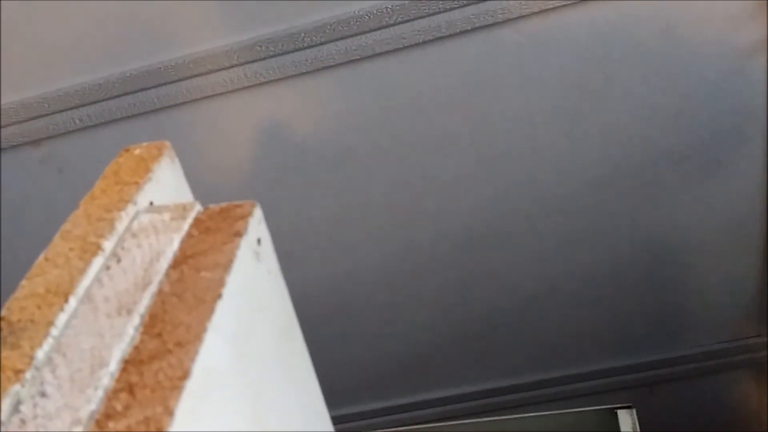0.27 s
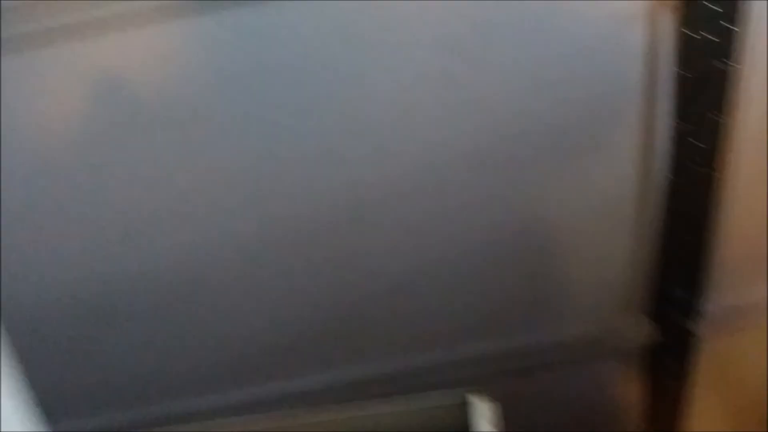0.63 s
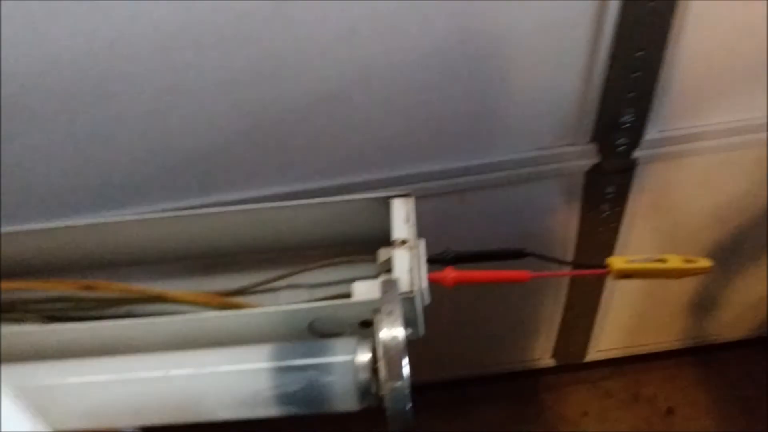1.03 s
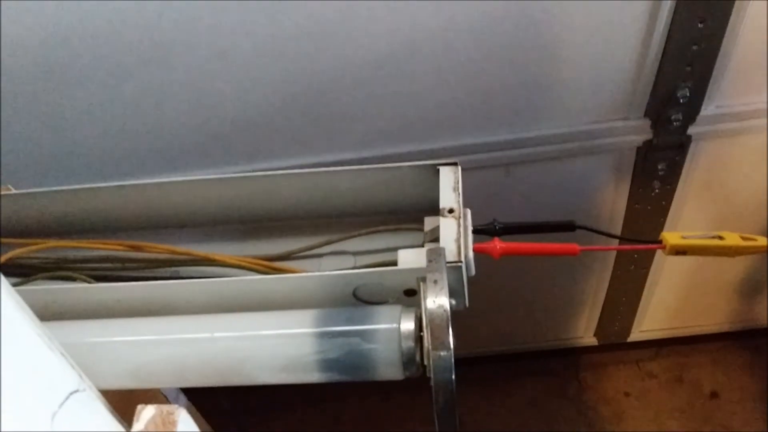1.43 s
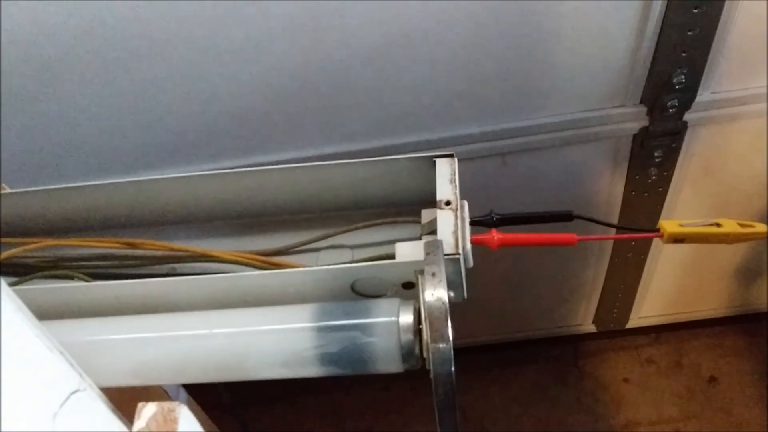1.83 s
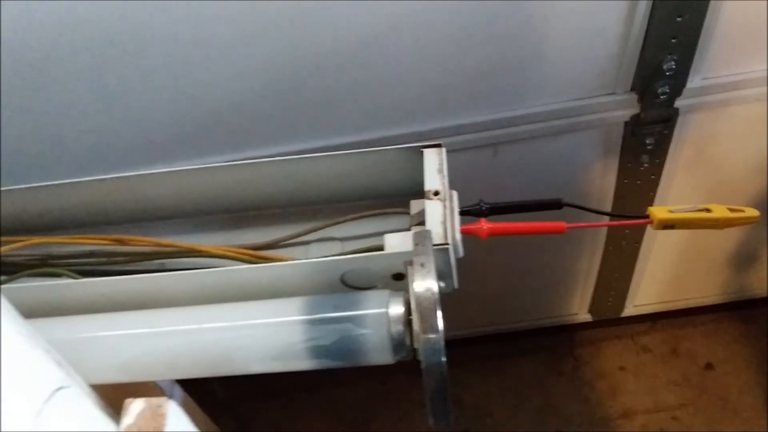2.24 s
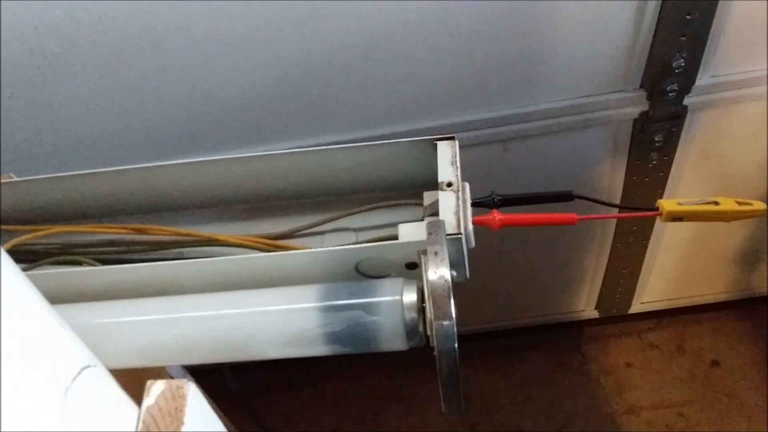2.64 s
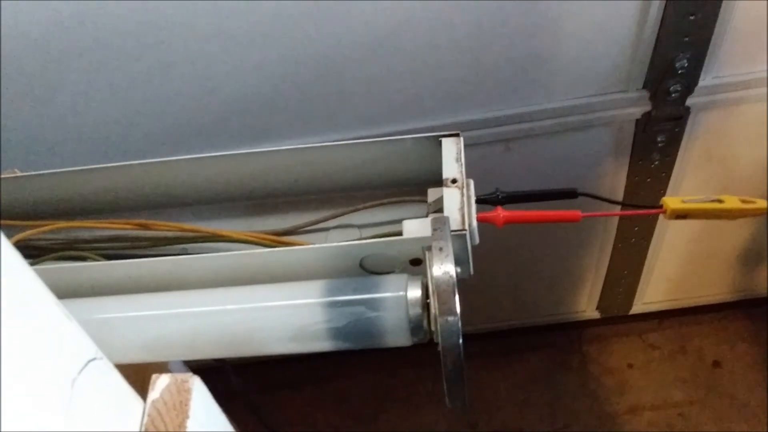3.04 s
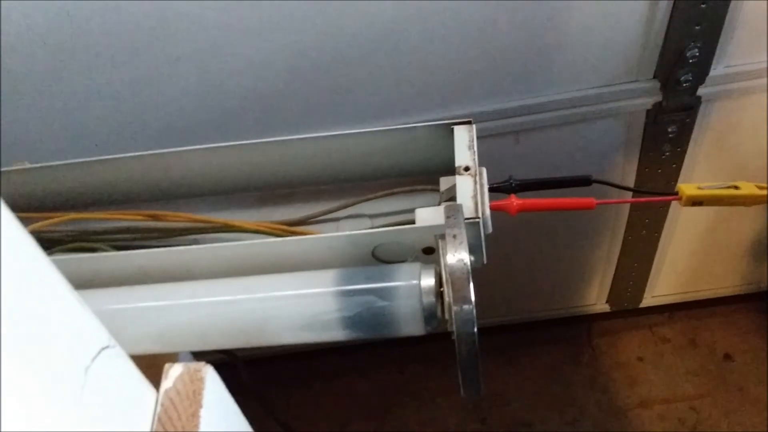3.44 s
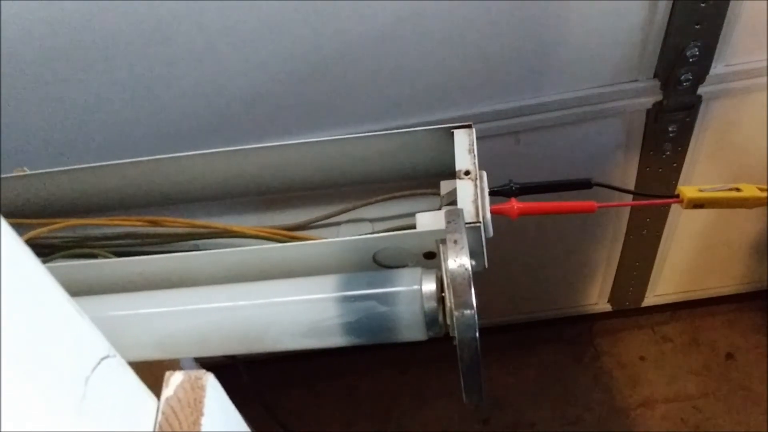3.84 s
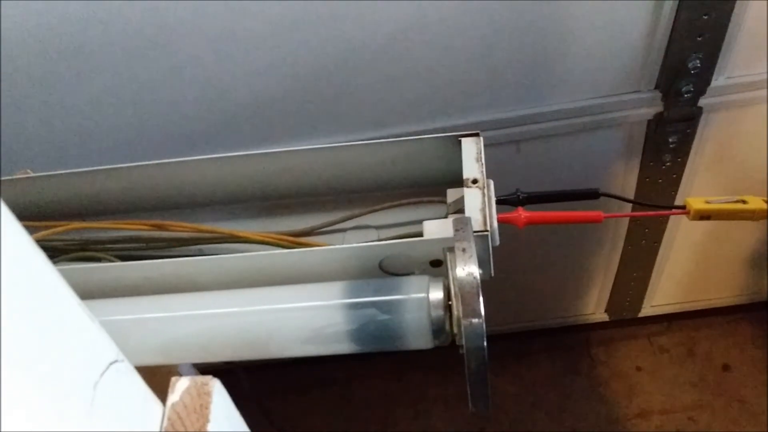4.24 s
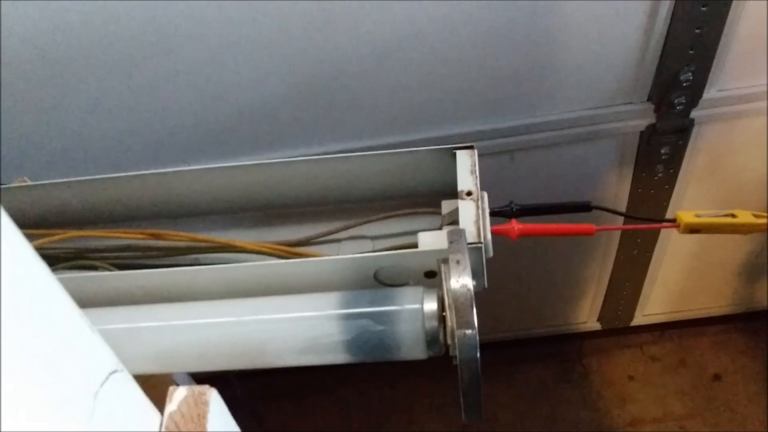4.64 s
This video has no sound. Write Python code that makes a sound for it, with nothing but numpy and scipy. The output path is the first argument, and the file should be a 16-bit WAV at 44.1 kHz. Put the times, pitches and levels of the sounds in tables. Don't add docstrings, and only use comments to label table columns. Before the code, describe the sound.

Someone shifts about beside an unlit tube fitting: thin, piercing key jingles, dry fabric crackles and small gritty sole scrapes, dense for two and a half seconds. Then it is nearly still, with light clinks and low building hum, before another brief burst around four seconds and tiny ticks at the end. Small dry room, bright phone microphone with a sharp ringing treble and little bass.

```python
import sys
import numpy as np
from scipy import signal
from scipy.fft import rfft, irfft, next_fast_len
from scipy.io import wavfile
from scipy.ndimage import uniform_filter1d

SR = 44100
rng = np.random.default_rng(int(sys.argv[2]) if len(sys.argv) > 2 else 0)


def volts_from_decibels(level):
    exponent = np.asarray(level, float) / 20
    return 10 ** exponent


def inscribe(sig):
    pcm = np.round(np.clip(np.atleast_2d(sig).T, -1, 1) * 32767)
    wavfile.write(sys.argv[1], SR, pcm.astype(np.int16))


N = 215843
HIGH_HZ = 9900


def unit(x):
    return x / np.sqrt(np.mean(x ** 2) + 1e-20)


def along(points, hz):
    f, value = np.transpose(points)
    return np.interp(np.log(hz + 1), np.log(f + 1), value)


def filtered(x, response):
    m = next_fast_len(len(x) + 8192)
    return irfft(rfft(x, m) * response(np.fft.rfftfreq(m, 1 / SR)), m)[:len(x)]


def noise(spectrum, size=N, patchy_db=0):
    z = signal.stft(rng.standard_normal(size + 512), nperseg=256)[2]
    field = uniform_filter1d(rng.standard_normal(z.shape), 5, 0)
    field = uniform_filter1d(field, 8, 1)
    x = signal.istft(z * volts_from_decibels(patchy_db * unit(field)), nperseg=256)[1][:size]
    return unit(filtered(x, lambda hz: volts_from_decibels(along(spectrum, hz))))


def add(track, s, sound):
    part = track[round(s * SR):][:len(sound)]
    part += sound[:len(part)]


def port(hz, peak_hz=8800, width_hz=700, peak_db=17, bass_hz=70):
    resonance = volts_from_decibels(peak_db) * 1j * hz * width_hz / (peak_hz ** 2 - hz ** 2 + 1j * hz * width_hz)
    return (1 + resonance) * (1j * hz / (bass_hz + 1j * hz)) ** 2


def ring(modes, t, length, bright_db=0):
    hz, level_db, t60 = np.transpose(modes)[:, :, None]
    level_db = level_db + bright_db * (hz > HIGH_HZ) + rng.normal(0, 1.0, hz.shape)
    fade = volts_from_decibels(level_db - 60 * t / (length * t60)) / abs(port(hz))
    cycles = hz * t + 0.2 * rng.random(hz.shape)
    return np.sum(fade * np.sin(2 * np.pi * cycles), axis=0)


def swells(events):
    out = np.zeros(N)
    for s, db, from_hz, to_hz, length in events:
        t = np.arange(round(length * SR)) / SR
        cycles = from_hz * t + (to_hz - from_hz) * t ** 2 / (2 * length)
        swell = np.sin(np.pi * t / length) ** 2
        add(out, s, volts_from_decibels(db) / abs(port(from_hz)) * swell * np.sin(2 * np.pi * cycles))
    return out


def clinks(events, length, crack_t60):
    # f/Hz, level/dB, t60/s
    key_modes = [
        [(6840, -41, .13), (8840, 0, .125), (9090, -17, .1), (10250, -31, .12), (10700, -32, .17),
         (11645, -23, .09), (12485, -24, .07), (12935, -34, .15), (13645, -33, .12), (15360, -40, .17),
         (15560, -44, .15)],
        [(5270, -36, .15), (7430, -37, .15), (9058, 0, .11), (9074, -10, .16), (9668, -12, .155),
         (11328, -39, .15), (12965, -30, .05), (14345, -33, .11)],
        [(5845, -30, .04), (8090, -15, .11), (8590, -6, .08), (8695, 0, .05), (8810, -7, .13),
         (10275, -13, .06), (11035, -25, .05), (12857, -24, .12), (14140, -28, .08)],
        [(7122, -22, .1), (8155, 1, .06), (8840, 16, .035), (9482, -6, .1), (9695, -11, .095),
         (10550, -12, .075), (11240, -22, .2), (11420, -9, .04), (12250, -15, .045), (13070, -24, .13),
         (13635, -2, .045), (13945, -5, .12), (15362, -15, .14), (15560, -1, .12)],
    ]
    # f/Hz, level/dB, t60/s
    fitting_modes = [
        [(10700, -15, .15), (15360, -5, .14), (15560, 0, .14)],
        [(2150, -6, .07), (3130, 2, .1), (3850, -4, .05), (5820, -4, .03)],
    ]
    # level/dB
    neighbour_db = [-30, -28, -20, -50, -66, -64]
    # f/Hz, level/dB
    steel = [(2000, -3.5), (5000, -2), (7000, -4.5), (8800, 2.5), (11000, -4), (13500, -12), (16000, -13)]
    pieces = key_modes + fitting_modes
    out, t = np.zeros(N), np.arange(SR // 6) / SR
    u = t[:SR // 20]
    for struck, rows in enumerate(events):
        for s, ring_db, crack_db, bright_db in rows:
            tones = np.zeros(len(t))
            for k, modes in enumerate(pieces):
                if k == struck or k < len(key_modes):
                    level_db = ring_db + neighbour_db[k] * (k != struck)
                    tones += volts_from_decibels(level_db) * ring(modes, t, length, bright_db)
            add(out, s, tones * (1 - np.exp(-t / 0.00081)))
            spectrum = [(hz, db + 0.5 * bright_db * (hz > HIGH_HZ)) for hz, db in steel]
            crack = noise(spectrum, size=len(u)) * (1 - np.exp(-u / 0.0011))
            add(out, s, volts_from_decibels(crack_db - 9.5 - 60 * u / crack_t60) * crack)
    return out


def keys():
    # t/s, ring level/dB, crack level/dB, high-mode brightness/dB
    free = [
        [(0.0638, -22.5, -43, -6), (1.229, -39.5, -47, -10), (1.2326, -38, -38, -8), (2.0482, -32.5, -25, 5),
         (2.4145, -31, -42, 4), (2.416, -29.5, -50, 3), (2.4165, -55, -33, -6), (2.4228, -30.5, -52, -12),
         (2.8898, -36, -35.5, 6), (3.2642, -36.5, -31, 5)],
        [(1.5618, -51, -60, 0), (1.7642, -27, -24.5, 8.5), (2.3225, -61, -52, 1)],
        [(0.0638, -29, -62, -12), (1.5595, -34.5, -38, 9), (2.8285, -47, -37, -4), (2.8898, -52, -32, -4),
         (4.1115, -63, -36, 0)],
        [(0.0638, -30.5, -61, 2), (4.1115, -74, -70, 0)],
        [(2.0482, -50, -70, -2), (4.1115, -51, -70, 0)],
        [(2.802, -70, -70, 0), (2.8524, -60, -70, 4), (2.8898, -64, -73, 0)],
    ]
    # t/s, ring level/dB, crack level/dB, high-mode brightness/dB
    muffled = [
        [(0.07, -43, -45, -3), (0.269, -29, -35, 0), (0.5685, -60, -44.5, -1), (0.9438, -29.5, -35.5, 7),
         (1.075, -55, -41, -5), (1.255, -36, -37.5, -5), (2.0482, -24, -64, -9), (2.806, -60, -47, 0),
         (3.242, -66, -38.5, -4), (3.501, -37.5, -42, -11), (3.8162, -77, -55.5, 4), (4.1, -60, -41.5, 2),
         (4.124, -65, -44, 0), (4.134, -65, -54, 0), (1.884, -55, -47, 0), (4.178, -60, -48, 0),
         (4.7635, -71, -47, -7)],
        [(0.269, -33.5, -66, 0), (1.0855, -30.5, -46, -5), (1.5595, -27, -56, 0), (1.928, -30, -15, -12),
         (2.0482, -42, -45, -6), (2.3057, -29, -37.5, 1), (3.2216, -41, -68, 0)],
        [(0.269, -26, -70, -9), (1.5595, -36, -28, 6), (1.9285, -39, -36, -3), (2.1672, -29.5, -35, -4),
         (2.5503, -37, -41, -5), (2.8515, -23, -38, -5), (3.2216, -41, -44, 0)],
        [(0.0638, -48, -33.5, 11), (0.0697, -34, -34, 6.5), (0.269, -45.5, -76, 2)],
    ]
    # t/s, level/dB, start f/Hz, end f/Hz, length/s
    grazes = [(0.073, -23, 8830, 8840, 0.008), (1.355, -41, 9000, 8900, 0.004),
              (1.826, -45, 7300, 7300, 0.004), (1.9285, -23, 8950, 8850, 0.0029),
              (2.3878, -51, 9450, 9400, 0.002), (2.5452, -46, 9900, 9800, 0.002),
              (2.552, -36, 8830, 8750, 0.0039), (0.072, -49, 5660, 5720, 0.0063),
              (0.943, -25, 8580, 8500, 0.0035), (1.5595, -47, 5730, 5900, 0.0063),
              (1.5608, -13, 8730, 8780, 0.0037), (1.573, -32, 8700, 8800, 0.0032),
              (1.6115, -41, 8800, 8900, 0.004), (1.9275, -16, 8700, 8000, 0.0025),
              (2.049, -22, 8850, 8800, 0.0026), (2.85, -44, 5670, 5800, 0.0055),
              (4.002, -39, 7860, 7400, 0.004), (4.179, -51, 8600, 8460, 0.004),
              (4.7645, -31.5, 8800, 8400, 0.0026)]
    wrapped = clinks(muffled, length=0.42, crack_t60=0.039) + swells(grazes)
    return clinks(free, length=1.1, crack_t60=0.013) + wrapped


def snaps():
    # t/s, peak level/dB, fold resonance f/Hz
    crisp = [(0.4283, -23.5, 2800), (0.4858, -29, 2200), (0.5275, -27.5, 2900), (0.661, -34.5, 1970),
             (0.709, -30.5, 2460), (0.736, -26, 2450), (0.747, -33, 2500), (0.7907, -33, 2670),
             (0.798, -38, 2620), (0.8245, -28, 2700), (0.8464, -29, 2300), (1.232, -33, 2330),
             (1.331, -36, 3000), (1.3493, -25, 2300), (1.3797, -24, 2720), (1.444, -47, 2720),
             (1.4649, -20, 2680), (1.4835, -28, 2700), (1.4873, -29, 2450), (1.518, -28, 2900),
             (1.623, -51, 2430), (1.6937, -29, 3000), (1.747, -44, 2700), (1.7564, -23, 2870),
             (1.8093, -25.5, 2800), (1.91, -35, 2500), (1.913, -39, 2800), (1.925, -24, 3000),
             (1.991, -37, 3000), (2.0698, -26, 2900), (2.0936, -31, 2420), (2.1037, -20.5, 2960),
             (2.1324, -28, 2700), (2.136, -29, 2330), (2.1456, -31, 2520), (2.162, -26, 2620),
             (2.4376, -39, 2600), (2.45, -41, 2900), (2.519, -45, 2400), (2.526, -45, 2700),
             (4.001, -30.5, 2000), (4.0945, -28.5, 2280), (4.0948, -30, 2420), (4.1686, -27.5, 2660),
             (4.1691, -20, 2770), (4.171, -32, 2600), (4.4647, -44, 2630)]
    # t/s, peak level/dB, fold resonance f/Hz
    soft = [(1.372, -32, 2600), (1.524, -33, 2700), (2.4495, -35.5, 2930), (0.476, -36, 3020),
            (0.4895, -38, 2600), (0.5, -38, 2600), (0.72, -38, 2500), (0.835, -44, 2600),
            (1.786, -31, 2500), (0.1136, -32, 2380), (0.3586, -33, 2030), (0.364, -34, 1840),
            (0.693, -37, 2520), (0.7503, -27.5, 2440), (0.822, -32, 2660), (0.906, -37.5, 2320),
            (1.4216, -23, 2720), (1.4668, -28, 2300), (1.469, -19.5, 2750), (1.473, -28, 2450),
            (1.478, -34, 2800), (1.4945, -31, 2700), (1.5405, -40, 2000), (1.558, -30, 2100),
            (1.576, -29, 2700), (1.776, -30, 2750), (1.7835, -32, 3040), (1.799, -31.5, 2720),
            (1.8446, -39, 2270), (1.879, -37, 2700), (1.886, -32.5, 2920), (2.2522, -39.5, 2320),
            (4.025, -24, 2650), (4.0465, -31.5, 2400), (4.0725, -41, 2100), (4.128, -37, 2520),
            (4.178, -46, 2700), (4.249, -40, 2400), (4.478, -36.5, 2960), (4.689, -43, 2620),
            (4.822, -49, 2900), (4.849, -48, 2300), (4.886, -43.5, 2600)]
    # t/s, peak level/dB, fold resonance f/Hz
    spiky = [(0.4822, -13, 2720), (0.7166, -34, 3020), (0.9143, -39, 2600), (0.9985, -52, 2500),
             (1.171, -39.5, 3360), (1.2106, -44, 2920), (1.706, -40, 3080), (2.059, -39, 2590),
             (3.2264, -59, 2350), (3.817, -52.5, 2810), (3.878, -50, 2310), (4.7392, -48, 2340)]
    # t/s, peak level/dB, fold resonance f/Hz
    ticks = [(0.628, -53.5, 2668), (1.658, -65, 2537), (1.827, -62, 2700), (2.3404, -54, 2590),
             (2.3884, -70, 1970), (2.3935, -71, 2510), (3.262, -65, 1760), (4, -48, 2610),
             (4.805, -41.5, 2600)]
    # edge level/dB, spike level/dB, decay/cycles
    folds = [
        (-7, -32.5, 7.3),
        (-28, -41, 8.7),
        (-3, -5.5, 5.6),
        (-7, 9.5, 3.8),
    ]
    out, t = np.zeros(N), np.arange(SR // 40) / SR
    for rows, (edge_db, spike_db, cycles) in zip((crisp, soft, spiky, ticks), folds):
        edge = volts_from_decibels(min(edge_db, 4) + 13 - 60 * t / 0.0008) * np.sin(2 * np.pi * 5000 * t)
        spike = volts_from_decibels(spike_db + 30.5 - 60 * t / 0.000066) * np.sin(2 * np.pi * 12500 * t)
        for s, db, hz in rows:
            fold = volts_from_decibels(-60 * t * hz / cycles) * np.sin(2 * np.pi * hz * t)
            pop = -(fold + edge) * (1 - np.exp(-t / 0.00008)) - spike
            after = rng.standard_normal(len(t)) * (rng.random(len(t)) < 0.08) * (t > 0.001)
            after *= volts_from_decibels(-15 - 60 * t / 0.024)
            chatter = np.convolve(after, fold + volts_from_decibels(-5.5) * (edge + spike))[:len(t)]
            add(out, s + 0.001055, volts_from_decibels(db - 1.5) * (pop + chatter))
    return filtered(out, lambda f: (1j * f / (850 + 1j * f)) ** 2)


def scuffs():
    # t/s, peak level/dB, thud level/dB, t60/s
    drags = [(0.113, -50.5, 7, 0.12), (0.7494, -31, -5, 0.022), (1.068, -48.5, -12, 0.38),
             (1.212, -48, -29, 0.53), (1.513, -43, -2, 0.17), (1.88, -51, -21, 0.1),
             (1.925, -32, -23, 0.095), (1.93, -25, -3.5, 0.11), (1.937, -39.5, -34, 0.32),
             (2.092, -41, -40, 0.33), (2.132, -41, -15, 0.2), (2.804, -58.5, -7, 0.6),
             (2.848, -55, -2, 0.12), (2.889, -57.5, -2, 0.13), (3.213, -48.5, -6, 0.23),
             (3.262, -47.5, -20, 0.14), (3.975, -55.5, -5, 0.19), (3.995, -44, -3, 0.11),
             (4.0, -40, -4, 0.068), (4.0239, -34, -17, 0.051), (4.042, -52.5, -4, 0.37),
             (4.112, -37, -2, 0.045), (4.172, -42, -14, 0.034), (4.475, -49, 6, 0.047),
             (4.689, -60.5, 3.5, 0.39), (4.761, -43, -2.5, 0.041), (4.88, -52, 0, 0.096)]
    # f/Hz, level/dB
    grit_spectrum = [(80, -50), (300, -1), (800, -8), (1400, -2), (2600, 2), (5000, -6), (9000, -12.5),
                     (16000, -12.5)]
    # f/Hz, level/dB
    thud_spectrum = [(30, -23), (60, -6), (130, -7.5), (200, 1.5), (400, -3), (700, -12), (1000, -7),
                     (1800, -48)]
    out, t = np.zeros(N), np.arange(SR // 4) / SR
    for s, db, thud_db, t60 in drags:
        grit = noise(grit_spectrum, size=len(t), patchy_db=1.0)
        grit *= volts_from_decibels(-60 * t / t60) * (1 - np.exp(-t / 0.0009))
        thud = noise(thud_spectrum, size=len(t), patchy_db=3.0)
        thud *= volts_from_decibels(thud_db - 60 * t / (1.87 * t60)) * (1 - np.exp(-t / 0.0077))
        add(out, s, volts_from_decibels(db - 7.5) * (grit + thud))
    return out


def step():
    # t/s, level/dB, start f/Hz, end f/Hz,
    # length/s
    flexes = [(0.4825, -43, 633, 484, 0.0057), (1.513, -46.5, 1120, 740, 0.014),
              (1.522, -55, 800, 470, 0.015), (1.952, -44, 810, 740, 0.017), (1.963, -50, 492, 440, 0.027),
              (1.98, -48, 270, 210, 0.022), (4.005, -58, 270, 110, 0.054), (4.1, -56.5, 647, 487, 0.033),
              (4.12, -66, 635, 596, 0.054), (3.882, -67, 995, 950, 0.01), (4.7, -61, 278, 128, 0.082)]
    # f/Hz, level/dB, t60/s
    wood_modes = [(67.5, -9, 0.17), (206.4, -3, 0.17), (397, 2.5, .06), (573, 1, 0.086), (722, -1, 0.12),
                  (925, -2, 0.11), (1327, 5.5, 0.092)]
    knock_s, knock_db = 1.927, -40
    out, t = swells(flexes), np.arange(SR // 4) / SR
    add(out, knock_s, volts_from_decibels(knock_db) * ring(wood_modes, t, 1) * (1 - np.exp(-t / 0.0052)))
    return out


def garage(x):
    # f/Hz, t60/s
    decay = [(200, 0.26), (2000, 0.07), (9000, 0.1), (16000, 0.055)]
    hz, t, z = signal.stft(rng.standard_normal(SR // 2), SR, nperseg=256)
    tail = signal.istft(z * volts_from_decibels(-60 * t / along(decay, hz)[:, None]), SR, nperseg=256)[1]
    return signal.fftconvolve(np.pad(x, (150, 0)), tail / np.linalg.norm(tail))[:N]


def crackle(rate, spread_db):
    heights = volts_from_decibels(spread_db * np.minimum(rng.exponential(size=N), 2))
    pops = (rng.random(N) < rate / SR) * heights
    return 1 + np.convolve(pops, volts_from_decibels(-60 * np.arange(200) / SR / 0.016))[:N]


def drones():
    # f/Hz, bandwidth/Hz, level over the hum/dB, start t/s, end t/s
    machines = [
        (107.5, 10, -8.5, 0, 1.6),
        (287.9, 13, -5.5, 1, 5.1),
        (344, 26, -15.5, 0.5, 5.5),
        (352, 49, -2, 3.5, 4.61),
    ]
    out, t = np.zeros(N), np.arange(N) / SR
    for hz, width_hz, db, start, end in machines:
        band = filtered(rng.standard_normal(N), lambda f: 1 / (1 + ((f - hz) / (width_hz / 2)) ** 2))
        presence = np.clip(np.minimum(t - start, end - t) / 0.12 + 0.5, 0, 1)
        out += volts_from_decibels(db) * unit(band) * presence
    return out


def background():
    # t/s, rustle level/dB
    moves = [(0.0, -58), (0.12, -54.5), (0.52, -55.5), (0.86, -58.5), (1.18, -61.5), (1.42, -54.5),
             (1.54, -56.5), (1.78, -58), (1.97, -53), (2.21, -60.5), (2.53, -63), (2.61, -72.5),
             (2.85, -73.5), (3.3, -62.5), (3.5, -74.5), (3.85, -72), (4.14, -63.5), (4.89, -74.5)]
    # start t/s, end t/s, level/dB
    pauses = [(.0, 0.072, -3.5), (0.556, 0.688, -6), (0.86, 0.887, -2.5), (1.277, 1.33, -5),
              (1.639, 1.692, -8), (2.008, 2.049, -5.5)]
    # f/Hz, level/dB
    cloth_spectrum = [(300, -8.5), (900, -5), (1600, -3.5), (2500, 0), (3500, -2.5), (6000, -11.5),
                      (10000, -13.5), (16000, -14.5)]
    # f/Hz, level/dB
    fizz_spectrum = [(3000, -41), (6500, -40.5), (8000, 9), (10000, -8), (13000, -4), (16000, -7)]
    # f/Hz, level/dB
    hum_spectrum = [(15, -93), (25, -14.5), (59, -14.5), (123, -7), (162, -10.5), (200, -10.5), (236, -9.5),
                    (287, -5), (358, -6.5), (395, -12), (436, -16), (545, -15), (700, -17.5), (910, -18),
                    (1540, -120)]
    # f/Hz, level/dB
    hiss_spectrum = [(30, -10), (200, -24), (1000, -0.5), (3000, -7), (6500, -13.5), (9000, -19),
                     (12000, -8), (16000, -8)]
    t = np.arange(N) / SR
    rustle_db = np.interp(t, *np.transpose(moves))
    movement_db = rustle_db + 60
    fizz_db, hum_db = -59 + movement_db, -62 + 0.35 * movement_db
    still_db = sum(db * ((t > start) & (t < end)) for start, end, db in pauses)
    still_db = uniform_filter1d(still_db, size=400)
    rustle = unit(noise(cloth_spectrum, patchy_db=1.5) * crackle(rate=430, spread_db=-20.5))
    rustle *= volts_from_decibels(rustle_db + still_db - 1.0)
    fizz = unit(noise(fizz_spectrum, patchy_db=2.6) * crackle(rate=190, spread_db=4.5))
    fizz *= volts_from_decibels(fizz_db + 1.7 * still_db - 16)
    hum = volts_from_decibels(hum_db - 1.1) * (noise(hum_spectrum, patchy_db=0.8) + drones())
    return rustle + fizz + hum + volts_from_decibels(-70.5) * noise(hiss_spectrum)


def scene():
    metal, cloth, floor = keys(), snaps(), scuffs() + step()
    far = volts_from_decibels(-6) * metal + volts_from_decibels(-4) * cloth + volts_from_decibels(1.0) * floor
    return (metal + cloth + floor + volts_from_decibels(-7.5) * garage(far) + background())[None]


def low_pass(x):
    return signal.sosfilt(signal.butter(12, 16990, fs=SR, output="sos"), x)


def record(dry):
    # f/Hz, level/dB
    roll_off = [(15850, 0), (15950, -26), (16900, -30), (17200, -90)]
    heard = filtered(dry[0], lambda hz: port(hz) * volts_from_decibels(along(roll_off, hz)))
    return low_pass(heard[None])


dry = scene()
out = record(dry)
inscribe(out)
```